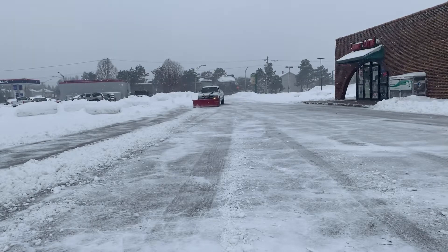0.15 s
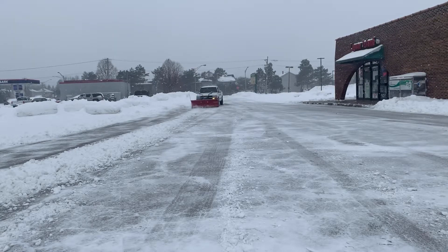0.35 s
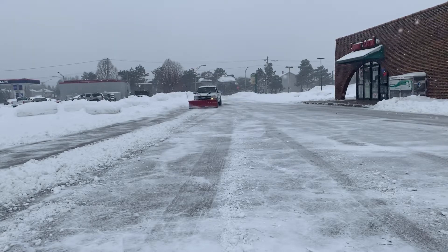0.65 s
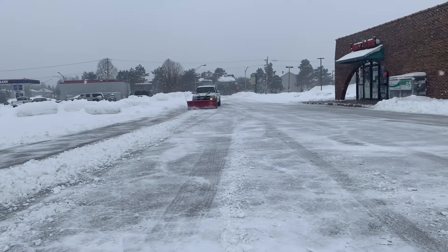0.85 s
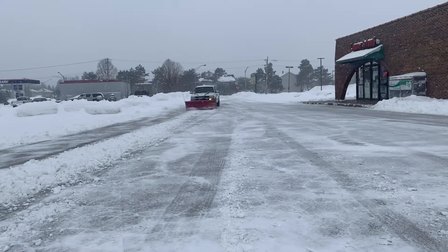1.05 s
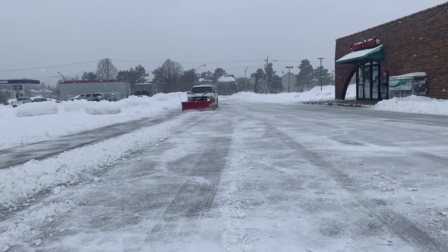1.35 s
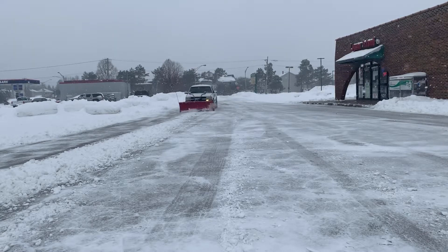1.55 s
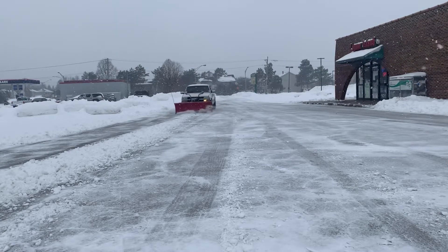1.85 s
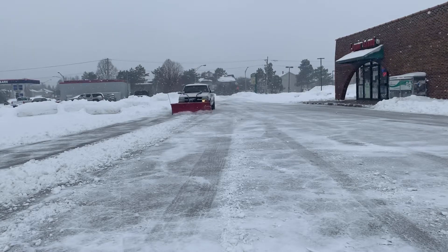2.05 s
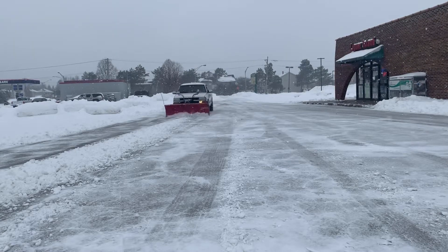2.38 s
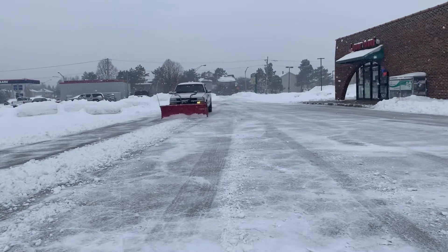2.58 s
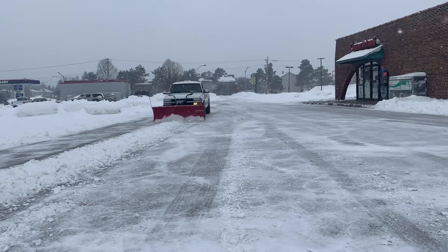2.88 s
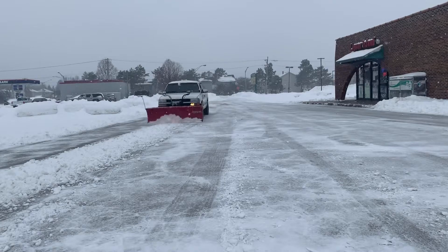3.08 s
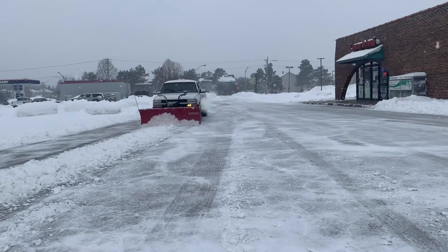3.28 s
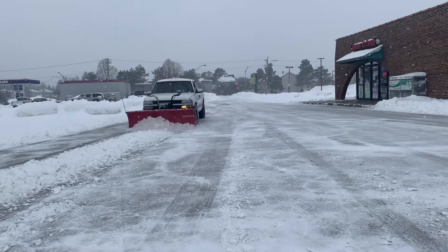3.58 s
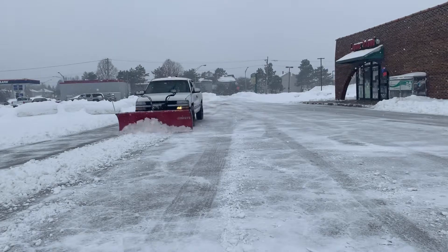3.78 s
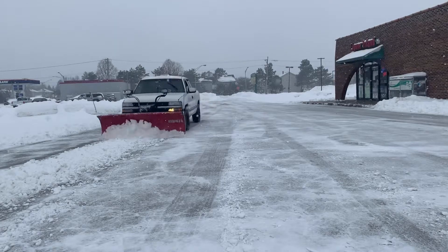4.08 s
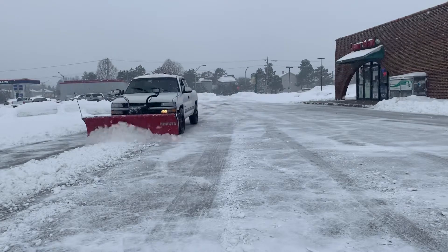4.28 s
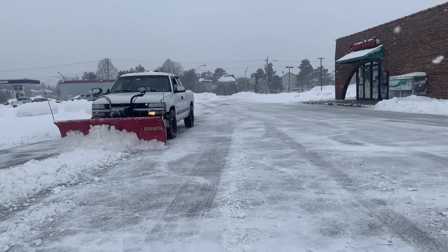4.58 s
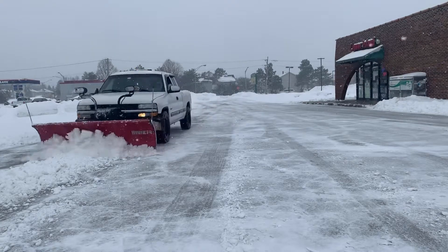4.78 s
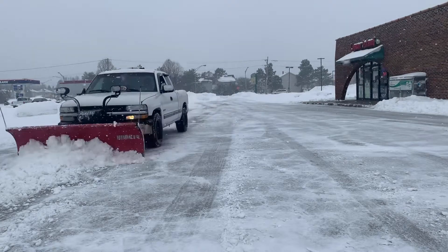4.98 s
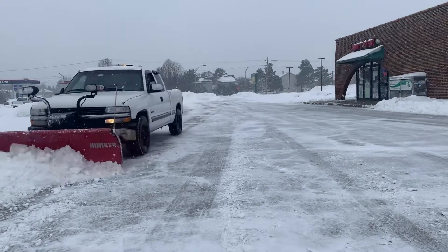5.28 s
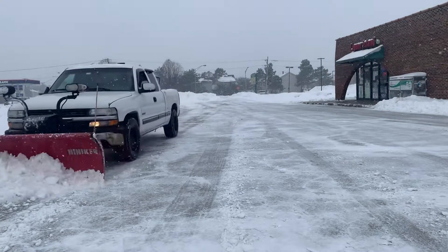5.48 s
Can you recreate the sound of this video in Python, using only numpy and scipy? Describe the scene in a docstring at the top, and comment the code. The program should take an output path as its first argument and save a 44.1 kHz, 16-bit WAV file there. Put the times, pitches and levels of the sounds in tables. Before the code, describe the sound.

Gritty metal scraping on icy pavement approaches in quick bursts, with hollow knocks, low jolts and crunching snow, then weakens close by.

```python
"""In an open lot a pickup starts well off, its steel snow blade scraping in short bites over packed ice.
About a second in the bites harden, the edge squeaks once and crusts snap: bursts of random cracks, coloured as steel and grit.
Knocks and low jolts, built from wavering tones, recur as it nears, over an engine drone, tyre rumble and snow hiss.
It draws level on the left, loud and close; then the scraping weakens and the engine sinks away.
A faint wall echo, wind on the microphone and a thin high hiss lie behind it all."""
import sys
import numpy as np
from scipy import signal
from scipy.fft import rfft, irfft
from scipy.io import wavfile
from scipy.ndimage import uniform_filter1d

SR = 44100
rng = np.random.default_rng(int(sys.argv[2]) if len(sys.argv) > 2 else 0)


def wrap_up_sound(samples):
    """Save the sound to the file named by the first command line argument, as 16-bit audio."""
    columns = np.atleast_2d(samples).T
    # keep every value between -1 and 1, then stretch to whole-number steps
    tamed = np.clip(columns, -1, 1)
    steps = np.round(tamed * 32767).astype(np.int16)
    wavfile.write(sys.argv[1], SR, steps)


N = 248724

# How icy the ground is under the edge. Each row: time in seconds, relative grit level of a firm bite in dB.
ICE = [(0, -29), (.7, -25.5), (.9, -28.5), (1.33, -14.5), (1.7, -25.5), (2.3, -19), (2.45, -25),
       (2.8, -24.5), (3.1, -28.5), (3.3, -24), (3.7, -28), (4.3, -32), (4.65, -38), (5.64, -34.5)]
# The truck jolts over ridges of ice. Each row: centre in seconds, pitch at the centre in Hz, relative level in dB.
JOLTS = [(1.371, 153.3, -17), (3.458, 123.6, -16.5), (3.694, 159, -16.5), (3.786, 127.7, -19.5),
         (4.011, 143, -17.5), (4.299, 145.2, -17), (4.589, 151, -21), (4.706, 141.6, -17.5),
         (5.001, 143.2, -21.5)]
JOLT_S = 0.02  # half length of a jolt
FIRM_BITE_DB, GRIT_DB_PER_DB = -11.5, 1.5  # harder bites throw up more than their share of grit


def undb(db):
    """Decibels to gain."""
    return 10 ** (np.asarray(db) / 20)


def unit(x):
    """Scale to rms 1."""
    return x / np.sqrt(np.mean(x ** 2))


def curves(rows):
    """Every column after the time of a table, drawn as straight lines between its rows at every sample."""
    seconds, *columns = np.transpose(rows)
    return [np.interp(np.arange(N) / SR, seconds, column) for column in columns]


def colour(x, points, size=8192):
    """Filter x through a causal minimum-phase response with the given (Hz, dB) shape; rms 1."""
    hz, db = np.transpose(points)
    freqs = np.maximum(np.arange(size // 2 + 1) * SR / size, 1)
    log_gain = np.log(undb(np.interp(np.log(freqs), np.log(hz), db)))
    # beyond both ends the shape falls by 12 dB an octave
    below = np.maximum(np.log(hz[0] / freqs), 0)
    above = np.maximum(np.log(freqs / hz[-1]), 0)
    log_gain -= 2 * (below + above)
    # folding the cepstrum onto positive times makes the response causal
    cepstrum = irfft(log_gain)[:size // 2]
    cepstrum[0] /= 2
    response = irfft(np.exp(2 * rfft(cepstrum, size)))[:size // 2]
    return unit(signal.fftconvolve(x, response[None], axes=1)[:, :N])


def walk(rate):
    """Smooth chance: random values, `rate` a second, joined by straight lines; rms 1."""
    steps = rng.standard_normal(8192)
    return unit(np.interp(np.arange(N) / SR * rate, np.arange(len(steps)), steps))


def fractures(per_s, spread_db):
    """Three unrelated trains of tiny cracks of unequal size: direct, scattered left, scattered right."""
    size = undb(spread_db * np.minimum(rng.exponential(size=(3, N)), 4))
    happens = rng.random((3, N)) < per_s / SR
    return happens * size * rng.choice([-1, 1], (3, N))


def chips(low_hz, high_hz, ring_s, spread_db, count, size):
    """Brief decaying rings, each at its own pitch; direct, scattered left, scattered right."""
    when, pitch, strength, life, *turns = rng.random((count, 7)).T
    hz = low_hz * (high_hz / low_hz) ** pitch
    gain = np.sqrt(hz) * undb(spread_db * np.minimum(-np.log(1 - strength), 3))
    age = np.arange(size) / SR
    envelope = gain[:, None] * np.exp(-age / (ring_s * (.5 + life[:, None])))
    at = ((when * N).astype(int)[:, None] + np.arange(size)).ravel()
    trains = []
    for turn in turns:  # each train starts its rings at other phases
        wave = envelope * np.sin(np.float32(2 * np.pi * (hz[:, None] * age + turn[:, None])))
        trains.append(np.bincount(at, wave.ravel(), N)[:N])
    return unit(np.array(trains))


def bounced(x):
    """Add short reflections off bumper and bonnet, whose paths wander as the truck rocks; rms 1."""
    delays_s, bounce_db, drift = (.0031, .0074), -8, .04  # drift is a share of the delay
    n, out = np.arange(N), x
    for delay_s in delays_s:
        late = n - delay_s * SR * (1 + drift * walk(2))
        out = out + undb(bounce_db) * x[:, np.maximum(np.round(late), 0).astype(int)]
    return unit(out)


def evened(x, span_s=0.02):
    """Keep the fine grain of x but hold its strength, so that the force alone sets the level."""
    return x / np.sqrt(uniform_filter1d(np.mean(x ** 2, axis=0), int(span_s * SR)) + 1e-6)


def place(x, lead_ms, scatter, pan_db):
    """Direct sound reaches the left side first; what the lot scatters differs on each side; rms 1."""
    n = np.arange(N)
    late = np.interp(n - lead_ms * SR / 1000, n, x[0])
    direct = np.array([x[0], late])
    balance = undb(np.array([[pan_db], [-pan_db]]) / 2)  # positive leans left
    return unit((direct + scatter * x[1:]) * balance)


def strike(start, length, attack_s):
    """The samples that a blow covers, their age, and its envelope: a quick rise and a rounded fall."""
    span = slice(max(int(start * SR), 0), min(int((start + 4 * length) * SR), N))
    age = np.arange(span.stop - span.start) / SR
    return span, age, np.minimum(age / attack_s, 1) * np.exp(-(age / length) ** 2 / 2)


def bites(rows, attack_s, blade_ring_s, grit_ring_s):
    """Strength of blade and grit: each bite sets in fast, holds while the edge drags, then dies away."""
    usual_bite_s, snap_db = 0.017, 1.3  # short bites are brittle: more grit per halving of their length
    t, power = np.arange(N) / SR, np.zeros((2, N))
    ring_s = np.array([[blade_ring_s], [grit_ring_s]])
    for start, length, blade_db in rows:
        grit_db = np.interp(start, *np.transpose(ICE)) + GRIT_DB_PER_DB * (blade_db - FIRM_BITE_DB)
        grit_db += snap_db * np.log2(usual_bite_s / length)
        span = slice(max(int((start - .02) * SR), 0), int((start + length + .15) * SR))
        age = t[span] - start
        rise = np.clip(age / attack_s + .5, 0, 1)
        fall = np.exp(-np.maximum(age - length + ring_s / 2, 0) / ring_s)
        power[:, span] += (rise * fall * undb([[blade_db], [grit_db]])) ** 2
    return np.sqrt(power)


def blade(force, nearness, lead_ms):
    """Coarse fractures and tumbling lumps shake the steel blade, whose colour shifts with distance."""
    # Colour of the shaken blade, far off and close. Each row: frequency in Hz, level in dB.
    far_tone = [(120, -33.5), (220, 1), (300, 2.5), (580, 6.5), (780, 0), (1050, -2), (1300, -13.5),
                (1800, -14.5), (2300, -23.5), (4000, -76.5)]
    near_tone = [(120, 2), (230, 6), (375, 3.5), (510, 5), (610, 2), (730, -1.5), (850, 0), (980, -12),
                 (1150, -7), (1420, -14), (1900, -17), (2500, -22), (4000, -53.5)]
    cracks = bounced(fractures(per_s=6000, spread_db=2.5) * undb(2.14 * walk(260)))
    close = np.clip(nearness / 2, 0, 1)
    steel = (1 - close) * colour(cracks, far_tone) + close * colour(cracks, near_tone)
    return force * evened(place(steel, lead_ms, scatter=0.22, pan_db=0.0))


def ringing(force, nearness, lead_ms, db):
    """Bites set the blade's plate modes ringing; they stand out as it comes close."""
    # Modes of the steel blade. Each row: frequency in Hz, 60 dB decay time in seconds, relative level in dB.
    modes = [(284.8, 0.083, 6.5), (381, 0.019, 7), (484.6, 0.24, 1), (725, 0.11, 1.5), (923, 0.015, -13),
             (1400, 0.02, 8), (2230, 0.13, -22)]
    cracks = unit(fractures(per_s=1500, spread_db=0.5))
    push = cracks * force ** 0.51 * undb(2.1 * np.minimum(nearness, 1.55))
    t = np.arange(SR // 4) / SR
    response = sum(undb(mode_db - 60 * t / t60) * np.sin(2 * np.pi * hz * t) for hz, t60, mode_db in modes)
    ring = signal.fftconvolve(push, response[None], axes=1)[:, :N]
    return undb(db) * place(ring, lead_ms, scatter=0.25, pan_db=3.0)


def squeaks():
    """Steel sticks and slips on the pavement for a moment: a short, wavering, sinking tone."""
    # Each row: start in seconds, length in seconds, first and last mean pitch in Hz, peak level in dB.
    rows = [(1.155, 0.042, 1870, 1660, -28)]
    t, out = np.arange(N) / SR, 0
    for start, length, start_hz, end_hz, db in rows:
        part = np.clip((t - start) / length, 0, 1)
        hz = (start_hz + (end_hz - start_hz) * part) * (1 + 0.026 * walk(500))
        swell = np.sin(np.pi * np.sqrt(part))
        out = out + undb(db) * swell * np.sin(2 * np.pi * np.cumsum(hz) / SR)
    return out


def knocks(lead_ms):
    """A snag makes the blade judder: a rough, hollow note that wobbles and sags by a share of its pitch."""
    # Each row: start in seconds, fall length in seconds, middle pitch in Hz, relative level in dB.
    rows = [(0.899, 0.021, 428, -10), (1.048, 0.045, 303, -12.5), (1.148, 0.004, 305, 1.5),
            (1.811, 0.011, 665, -10.5), (2.033, 0.015, 409, -12), (2.424, 0.012, 520, -8.5),
            (2.762, 0.018, 392, -11), (2.961, 0.016, 640, -11), (3.272, 0.011, 624, -9),
            (3.464, 0.016, 470, -12.5), (3.569, 0.012, 724, -10), (4.112, 0.0096, 693, -7),
            (4.277, 0.017, 565, -9), (4.398, 0.015, 403, -9.5), (4.547, 0.018, 367, -6.5),
            (4.553, .014, 730, -8.5), (4.889, 0.009, 398, -15.5), (5.214, 0.008, 382, -12.5)]
    sag, wobble = .03, .06 * walk(300)  # shares of the pitch
    rough = unit(undb(1.5 * walk(250)))
    out = np.zeros(N)
    for start, length, hz, db in rows:
        span, age, shape = strike(start, length, attack_s=.007)
        pitch = hz * (1 + sag * (.5 - age / length) + wobble[span])
        out[span] += undb(db) * shape * np.sin(2 * np.pi * np.cumsum(pitch) / SR)
    out = out * rough
    return np.std(out) * place(np.array([out] * 3), lead_ms, scatter=0, pan_db=0.0)


def grit(force, nearness, lead_ms):
    """Ice crumbles in quick spurts of cracks and chips; close up, the snow heaped before the blade muffles it."""
    # Colour of the crushed ice, far off, midway and close. Each row: frequency in Hz, level in dB.
    far_tone = [(1200, 6), (2000, 1), (2900, -4), (3500, 2.5), (4600, -4.5), (5400, 1.5), (6700, -6.5),
                (8400, -11), (10000, -10.5), (15500, -36)]
    mid_tone = [(1200, -29), (2000, 10), (2600, 9), (3500, -3.5), (4600, -12), (6700, -10), (8400, -19.5),
                (10500, -14), (12000, -19), (13500, -16), (15500, -27)]
    near_tone = [(1200, -27), (2000, 5), (2500, -4.5), (3100, -29), (3800, -6), (5100, -6.5), (6300, -19.5),
                 (8400, -16), (13500, -23.5), (15500, -46)]
    cracks = unit(fractures(per_s=9100, spread_db=4.0))
    cracks = cracks + chips(1042, 15600, ring_s=0.0013, spread_db=-0.5, count=11000, size=512)
    cracks = bounced(cracks) * undb(2.15 * walk(240))
    shares = [np.clip(1 - abs(nearness - k), 0, 1) for k in range(3)]
    tones = (far_tone, mid_tone, near_tone)
    ice = sum(share * colour(cracks, tone) for share, tone in zip(shares, tones))
    # harder bites shatter the ice more finely, with a larger share of the top octave
    shatter_tone = [(4000, 14), (8000, -13.0), (13800, 14.0), (15500, -27.0)]
    shatter = colour(cracks * undb(5.5 * walk(200)), shatter_tone)
    ice = ice + shatter * np.minimum(force / undb(-5.0), 1.5) * undb(-4.5)
    return force * evened(place(ice, lead_ms, scatter=0.83, pan_db=-2.0))


def snaps(lead_ms):
    """A crust of ice gives way in a short, dense, bright volley of fine cracks."""
    # Each row: start in seconds, fall length in seconds, level in dB.
    rows = [(0.256, 0.0057, -43), (0.869, 0.019, -35), (0.9, 0.056, -31.5), (1.055, 0.023, -34),
            (1.281, 0.0079, -21), (1.307, .012, -25.5), (1.326, 0.0052, -23.5), (1.365, 0.0048, -27.5),
            (1.413, 0.0085, -32.5), (1.644, 0.0098, -40), (1.734, 0.0078, -40), (2.815, 0.0081, -41),
            (3.424, .008, -43), (3.757, 0.0045, -44), (3.945, 0.037, -35), (4.281, 0.0051, -28),
            (4.734, 0.045, -47), (4.962, 0.0062, -38)]
    # Colour of the crackle. Each row: frequency in Hz, level in dB.
    tone = [(1500, -5), (3200, 2.5), (5600, 7.5), (8400, -12), (10200, -5.5), (12000, -33), (13500, -13),
            (15500, -44)]
    force = np.zeros(N)
    for start, length, db in rows:
        span, age, shape = strike(start, length, attack_s=0.0022)
        force[span] += undb(db) * shape
    crackle = colour(fractures(per_s=3400, spread_db=5.5) * undb(2.0 * walk(260)), tone)
    return force * evened(place(crackle, lead_ms, scatter=0.89, pan_db=-2.5))


def heap(force, nearness, lead_ms):
    """Close up, the packed heap in front of the blade crunches with every push."""
    tone = [(850, -10.0), (1000, 10), (1200, 2.5), (1750, -4.5), (1950, -19), (2400, -27.5)]
    crunch = colour(bounced(fractures(per_s=1600, spread_db=3.0)), tone)
    gain = undb(-7.5 + 14 * np.minimum(nearness - 1.9, 0))
    return force * gain * evened(place(crunch, lead_ms, scatter=0.5, pan_db=7))


def snow(db, force, nearness, lead_ms):
    """Loose snow rolls off with a fine hiss; while the truck is far, each push sizzles in one sharp band."""
    # Colour of the rolling snow. Each row: frequency in Hz, level in dB.
    tone = [(1300, -4.5), (2100, 1), (3000, -3.5), (4000, -4), (5600, -9.5), (7500, -13), (10500, -42),
            (14000, -47)]
    grains = place(bounced(fractures(per_s=7700, spread_db=13.0)), lead_ms, scatter=1.0, pan_db=-3.5)
    sizzle = colour(grains, [(4300, -16), (5700, 2), (6300, -2), (7200, -14.0)])
    hiss = undb(db + 2.5 * walk(60)) * colour(grains, tone)
    return hiss + force * undb(-23.5) * np.clip(1 - nearness, 0, 1) * sizzle


def frame_level(push, nearness):
    """Rumble level in dB: the tyres roll steadily, the blade's push shakes the frame, ridges jolt it."""
    roll_db, roll_near_db = -28.5, -0.5  # tyres far away; change per step of nearness
    share_db, settle_s = -3.5, 0.02  # share of the push that shakes the frame; decay of its power
    jolt_rumble_db = -0.5
    t, keep = np.arange(N) / SR, np.exp(-1 / (settle_s * SR))
    shaken = signal.lfilter([1 - keep], [1, -keep], (push * undb(share_db)) ** 2)
    jolts = sum(undb(db + jolt_rumble_db) ** 2 * np.exp(-((t - s) / JOLT_S) ** 2) for s, hz, db in JOLTS)
    rolling = undb(roll_db + roll_near_db * nearness) ** 2
    return 10 * np.log10(rolling + shaken + jolts)


def rumble(db, lead_ms):
    """Frame and tyres boom over the ridged ice: sparse cracks in a low colour."""
    # Colour of frame and tyres. Each row: frequency in Hz, level in dB.
    tone = [(25, -14), (48, -19), (65, -10), (88, -12.5), (120, -1.5), (150, -2.5), (225, 1), (255, -6.5),
            (300, -5.5), (420, -7.5), (800, -34)]
    low = colour(fractures(per_s=900, spread_db=-3.5), tone)
    return undb(db) * place(low, lead_ms, scatter=0.2, pan_db=-2.5)


def boom(db):
    """The shaken frame rings on one low note, a resonance fed by noise."""
    note_hz, t60_s, note_db = 151.9, 0.36, -7.5  # level relative to the frame level
    t = np.arange(SR // 2) / SR
    response = undb(-60 * t / t60_s) * np.sin(2 * np.pi * note_hz * t)
    return undb(db + note_db) * unit(signal.fftconvolve(rng.standard_normal(N), response)[:N])


def jolt_notes():
    """Each jolt swells into a short, low boom that sinks as the springs unload."""
    note_db, sag_per_s = 2, 1.3  # sag is a share of the pitch
    t, out, waver = np.arange(N) / SR, np.zeros(N), 0.093 * walk(120)
    for s, hz, db in JOLTS:
        span = abs(t - s) < 4 * JOLT_S
        age = t[span] - s
        phase = 2 * np.pi * np.cumsum(hz * (1 - sag_per_s * age + waver[span])) / SR
        swell = np.exp(-(age / JOLT_S) ** 2 / 2)
        out[span] += undb(db + note_db) * swell * np.sqrt(2) * np.sin(phase)
    return out


def engine():
    """The firing note and two overtones, lumpy in level and unsteady in pitch."""
    # Each row: time in seconds, mean firing rate in Hz, relative level in dB.
    rows = [(0, 117, -45), (1.1, 130, -25.5), (3.55, 124.2, -25.5), (3.95, 128, -21), (4.3, 148, -32),
            (4.9, 145, -20), (5.64, 122, -57)]
    hz, db = curves(rows)
    phase = 2 * np.pi * np.cumsum(hz * (1 + 0.06 * walk(30))) / SR
    note = np.sin(phase) + undb(-11) * np.sin(2 * phase) + undb(-14) * np.sin(3 * phase)
    lumps = undb(7.4 * np.tanh(walk(65)))
    return unit(note * lumps) * undb(db - 4.5)


def shop_wall(x, delay_s, echo_db):
    """The brick front and snow banks return a faint, smeared echo: a decaying tail of noise."""
    t = np.arange(SR // 2) / SR
    tail = rng.standard_normal((2, len(t))) * np.exp(-t / 0.14) * (t > delay_s)
    tail /= np.sqrt(np.sum(tail ** 2, axis=1, keepdims=True))
    return undb(echo_db) * signal.fftconvolve(x, tail, axes=1)[:, :N]


def wind():
    """A light breeze in gusts buffets the microphone ports, partly together, partly each on its own."""
    # Each row: time in seconds, level in dB about which the breeze flutters.
    gusts = [(0, -41), (1.12, -30.5), (1.55, -38.5), (2.1, -36), (2.7, -45), (3.6, -31), (5.64, -43)]
    air = rng.standard_normal(N) + 1.03 * rng.standard_normal((2, N))
    buffet = colour(air, [(33, -62), (47, -2.5), (72, 0.5), (110, -11.0), (300, -13)])
    return buffet * undb(curves(gusts)[0] + 3.5 * walk(22))


def air_hiss():
    """A faint high hiss lies behind everything and sinks for a while midway."""
    # Each row: time in seconds, level in dB.
    rows = [(0, -52.5), (3.3, -64), (4.7, -54.5)]
    tone = [(2000, 5.5), (6000, -7.0), (9000, -7.5), (14000, -10.0), (15500, -17)]
    return undb(curves(rows)[0]) * colour(rng.standard_normal((2, N)), tone)


def scene():
    """The truck with its scraping blade, drawing near in the open lot."""
    # Bites of the edge. Each row: start in seconds, length in seconds, relative level in dB.
    scrapes = [(0.0, 0.034, -20), (0.099, 0.02, -18.5), (0.135, 0.11, -24), (0.245, 0.03, -19.5),
               (0.368, 0.042, -22), (0.454, 0.032, -21), (0.523, 0.036, -23), (0.578, 0.031, -21),
               (0.66, 0.042, -25.5), (0.742, 0.022, -17), (0.77, 0.06, -23.5), (0.865, 0.13, -19),
               (0.898, 0.026, -22), (1.03, 0.044, -14), (1.143, 0.0096, -13), (1.2, 0.15, -19.5),
               (1.41, 0.021, -23), (1.479, 0.0063, -19), (1.58, 0.017, -17), (1.647, 0.011, -14),
               (1.68, 0.019, -17.5), (1.726, 0.0083, -14.5), (1.762, 0.0055, -15.5), (1.803, 0.035, -15.5),
               (1.88, 0.04, -13.5), (1.942, 0.045, -14), (2.028, 0.034, -20), (2.054, 0.005, -12),
               (2.085, 0.048, -17.5), (2.191, 0.015, -16.5), (2.242, 0.024, -15), (2.275, 0.024, -19.5),
               (2.318, 0.022, -15), (2.36, 0.016, -15), (2.423, 0.009, -13.5), (2.457, 0.042, -21),
               (2.506, 0.016, -14.5), (2.556, 0.041, -14), (2.622, 0.034, -15), (2.677, 0.051, -14.5),
               (2.743, 0.039, -16), (2.811, 0.011, -12), (2.835, 0.025, -12.5), (2.887, 0.042, -13.5),
               (2.956, 0.027, -14), (3.04, 0.024, -19.5), (3.129, 0.021, -16.5), (3.192, 0.02, -19.5),
               (3.267, 0.011, -12), (3.339, 0.0095, -13), (3.463, 0.01, -19.5), (3.572, 0.019, -13),
               (3.623, 0.018, -12), (3.67, 0.013, -15), (3.808, 0.023, -22), (3.884, 0.046, -11.5),
               (3.941, 0.063, -13.5), (4.064, 0.027, -11), (4.106, 0.013, -9.5), (4.135, 0.025, -13),
               (4.18, .012, -23), (4.275, 0.017, -9.5), (4.311, 0.02, -12), (4.405, 0.011, -9),
               (4.434, 0.03, -12.5), (4.508, 0.023, -12.5), (4.545, 0.02, -9), (4.58, 0.013, -13.5),
               (4.633, 0.036, -12), (4.675, 0.042, -16), (4.728, 0.079, -14.5), (4.8, 0.035, -17),
               (4.882, 0.021, -22), (4.95, 0.038, -12.5), (4.995, 0.024, -18.5), (5.057, 0.054, -22.5),
               (5.132, 0.033, -19), (5.214, 0.011, -27), (5.276, 0.17, -19), (5.482, 0.082, -21)]
    # Each row: time in seconds, nearness (0 far, 1 midway, 2 close), lead of the left side in ms.
    approach = [(0, 0.094, 0.042), (1.3, 0.055, 0.064), (2.4, 0.69, 0.076), (3.3, 0.87, 0.1),
                (4.3, 1.51, 0.12), (5.64, 1.96, 0.19)]
    # Weight of snow on the sliding blade. Each row: time in seconds, level in dB before the judder.
    load_rows = [(0, -33.5), (.72, -34.5), (.95, -25), (1.015, -30), (1.06, -22), (1.38, -24), (1.46, -35),
                 (1.53, -24), (2.0, -26), (2.4, -32), (2.8, -24), (3.08, -34.5), (3.75, -30.5), (4.35, -29),
                 (4.78, -26.5), (4.87, -31.5), (5.1, -26.5), (5.22, -39.5), (5.64, -40)]
    grind_db = -0.5  # grit ground off between bites
    hiss_db, muffle_db = -17.5, 5  # snow hiss relative to the load; loss per step of nearness

    nearness, lead_ms = curves(approach)
    load_db = curves(load_rows)[0] + 2.5 * np.tanh(walk(87))  # the sliding blade sticks and slips
    shake, crush = bites(scrapes, attack_s=0.0092, blade_ring_s=0.007, grit_ring_s=0.0081)
    push = np.hypot(shake * undb(-2.5), undb(load_db))

    steel = blade(push, nearness, lead_ms) + squeaks()
    steel = steel + ringing(shake, nearness, lead_ms, db=-31.5) + knocks(lead_ms)

    grind = undb(curves(ICE)[0] + GRIT_DB_PER_DB * (load_db - FIRM_BITE_DB) + grind_db)
    ice = grit(np.hypot(crush * undb(-1.5), grind), nearness, lead_ms) + snaps(lead_ms)

    load = snow(load_db + hiss_db - muffle_db * nearness, push, nearness, lead_ms)
    load = load + heap(push, nearness, lead_ms)

    frame_db = frame_level(push, nearness)
    body = rumble(frame_db - 0.5, lead_ms) + boom(frame_db) + jolt_notes() + engine()

    echo = shop_wall(steel, delay_s=0.0054, echo_db=-24)
    return steel + ice + load + body + echo + wind() + air_hiss()


def record(dry):
    """The microphone chain drops the deepest bass, rounds the highest peaks and cuts the top."""
    lean = signal.sosfilt(signal.butter(4, 36, "high", fs=SR, output="sos"), dry)
    rounded = lean / (1 + lean ** 4) ** (1 / 4)
    return signal.sosfilt(signal.ellip(10, .2, 70, 15750, fs=SR, output="sos"), rounded)


dry = scene()
out = record(dry)
wrap_up_sound(out)
```